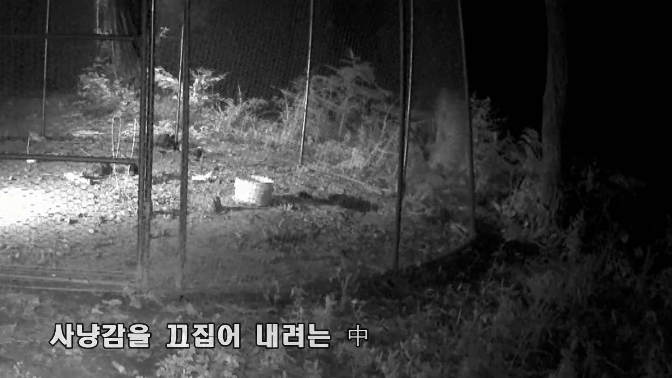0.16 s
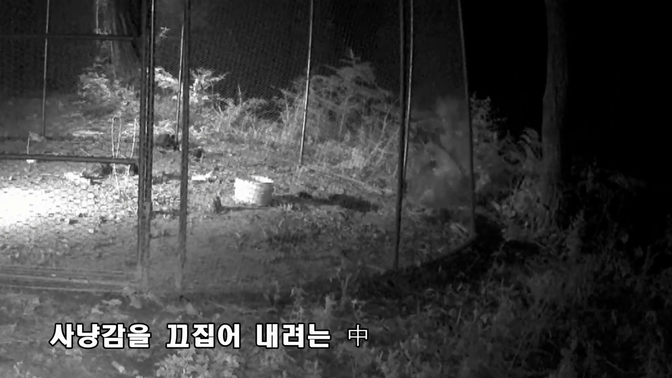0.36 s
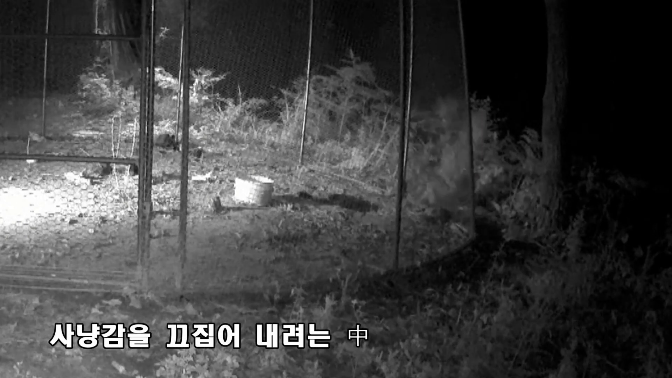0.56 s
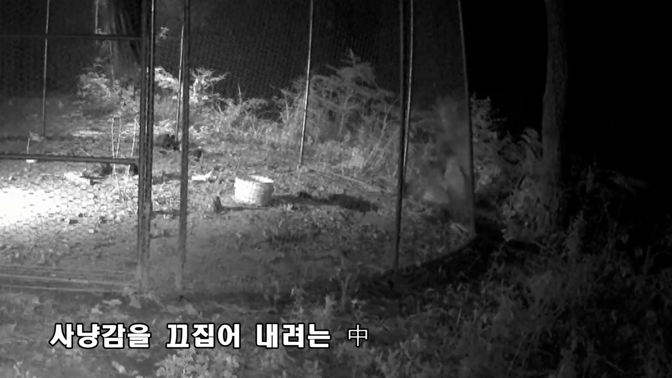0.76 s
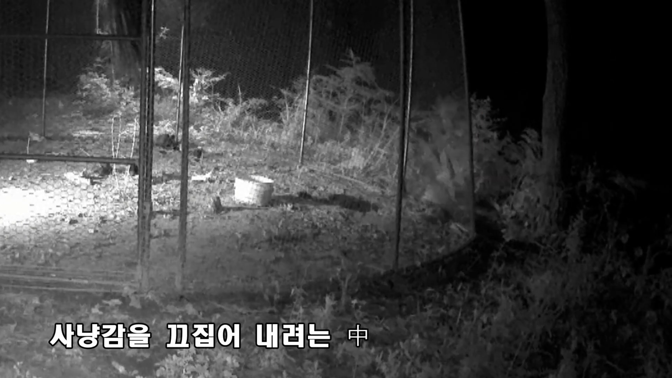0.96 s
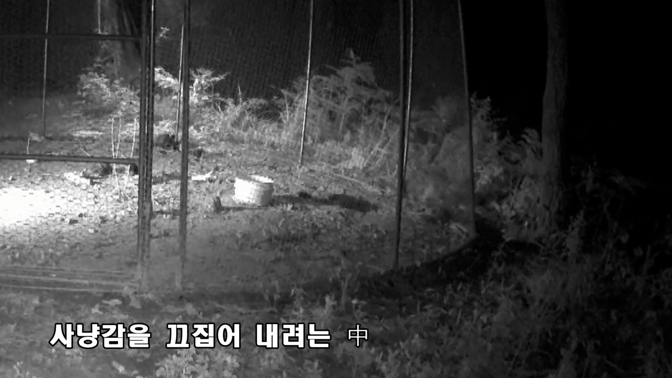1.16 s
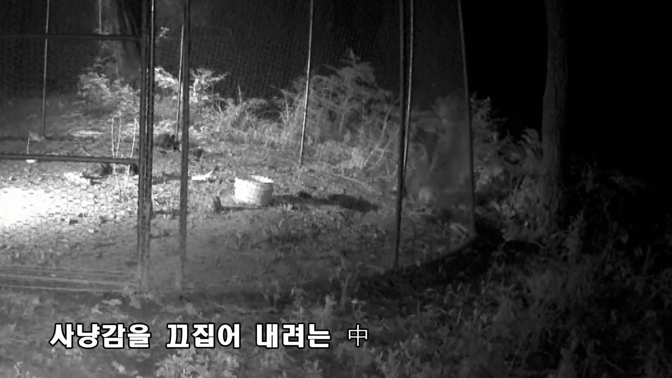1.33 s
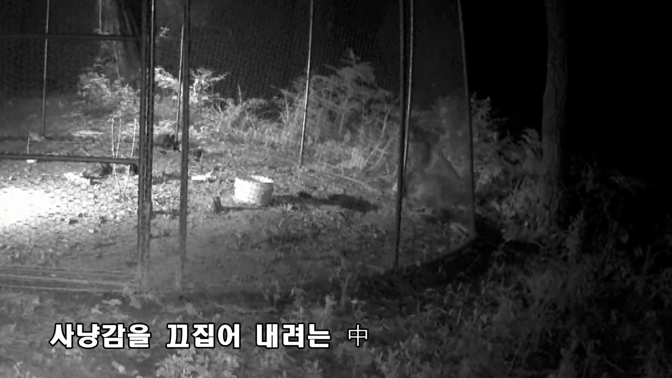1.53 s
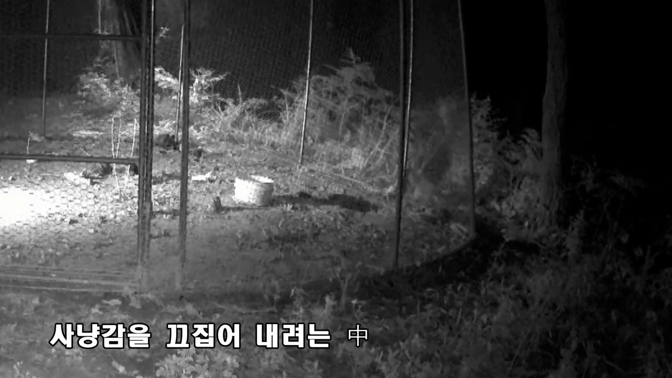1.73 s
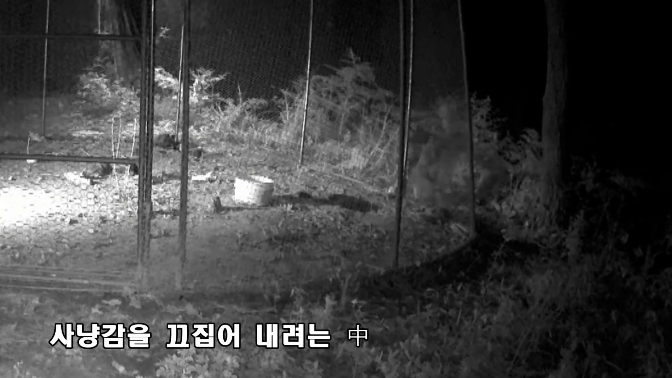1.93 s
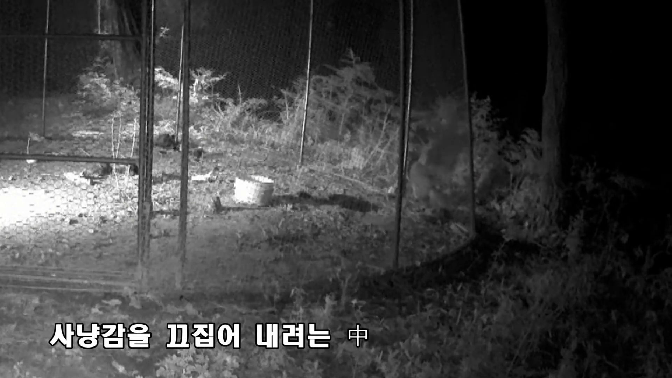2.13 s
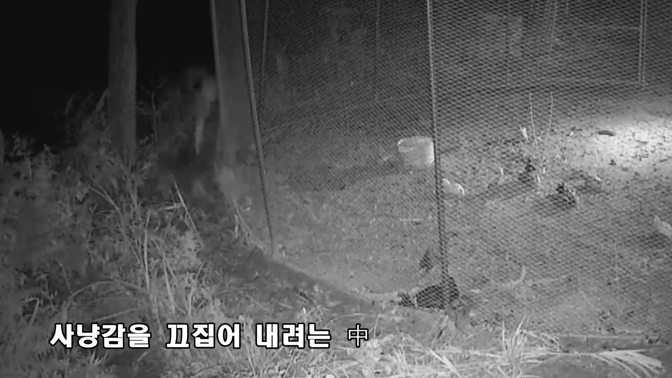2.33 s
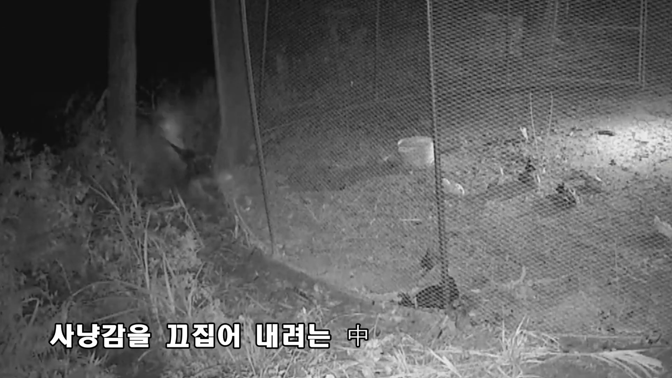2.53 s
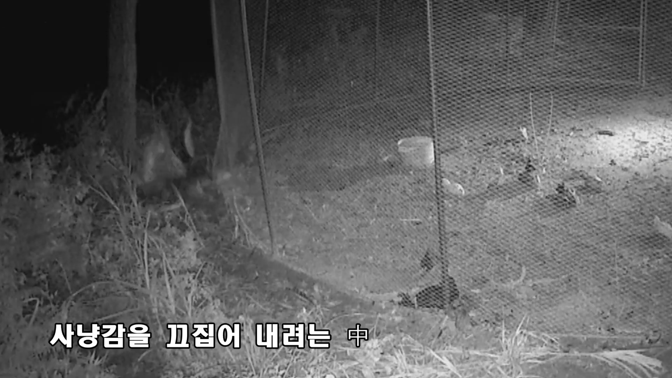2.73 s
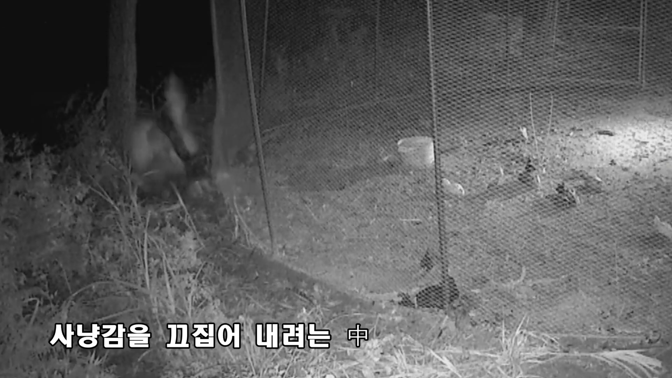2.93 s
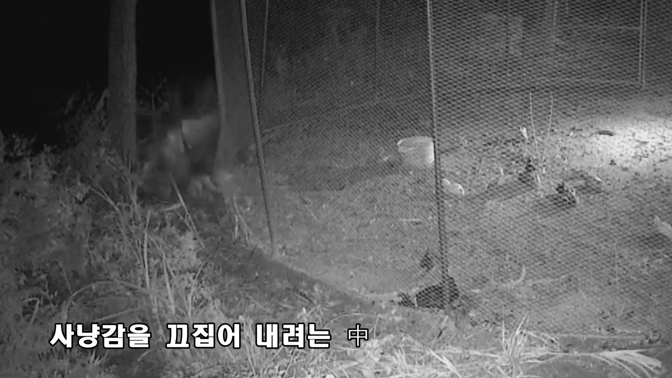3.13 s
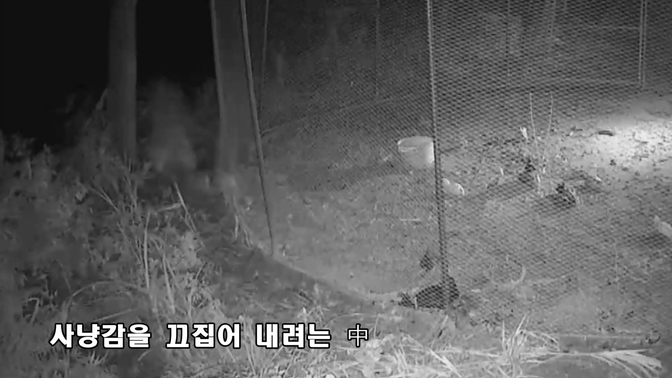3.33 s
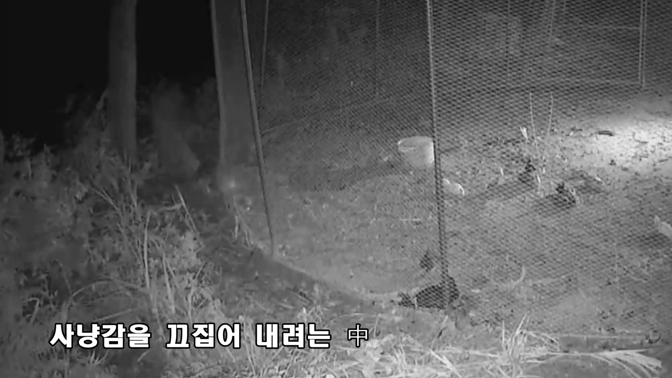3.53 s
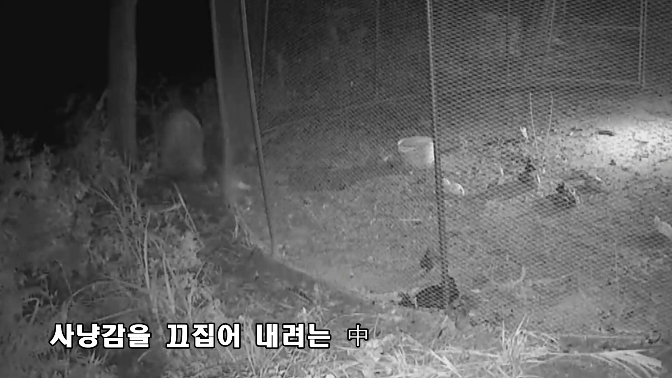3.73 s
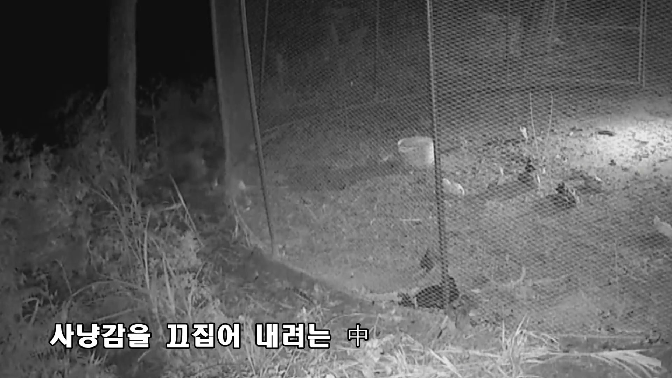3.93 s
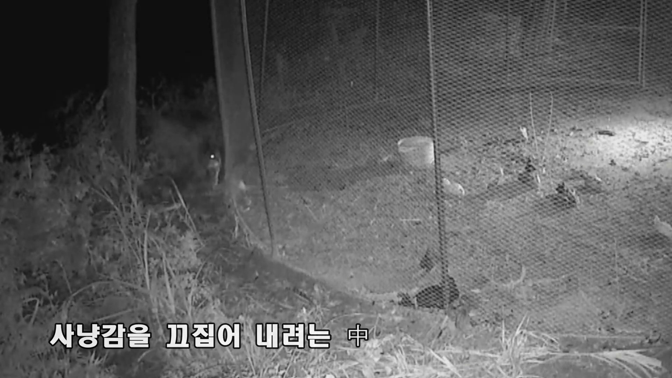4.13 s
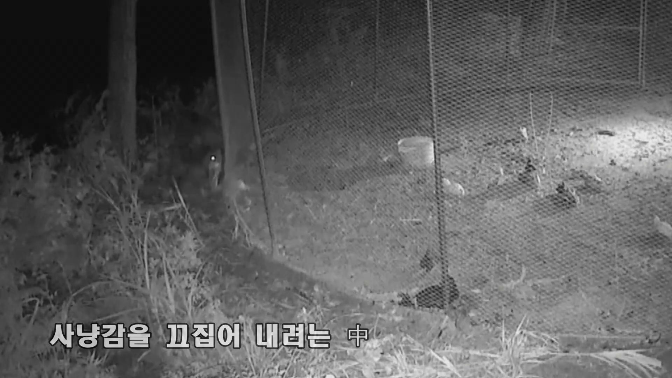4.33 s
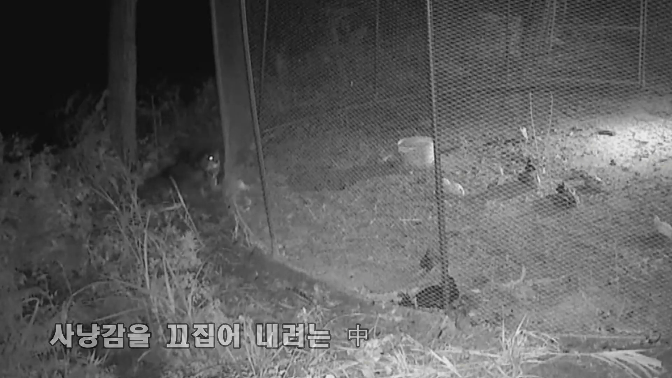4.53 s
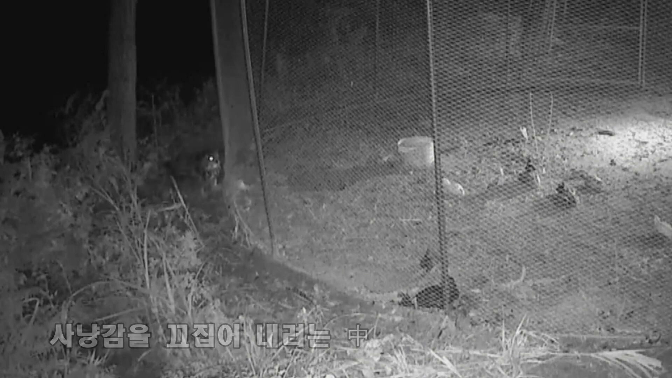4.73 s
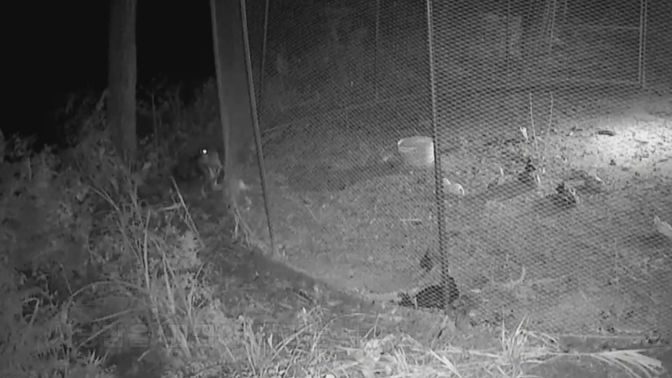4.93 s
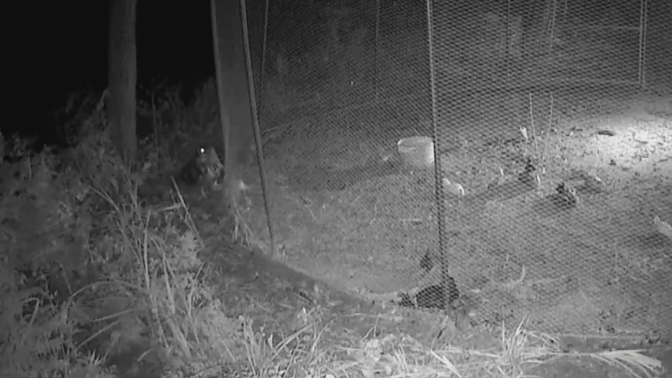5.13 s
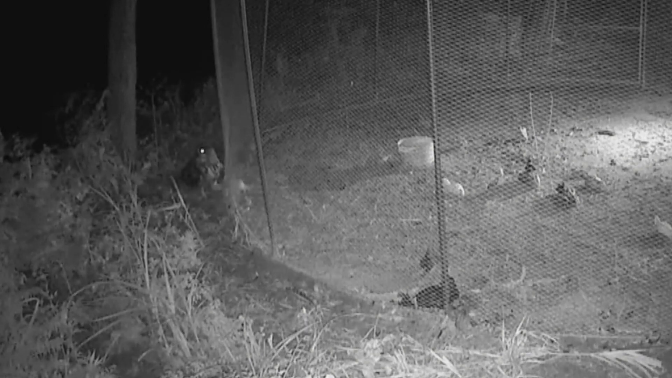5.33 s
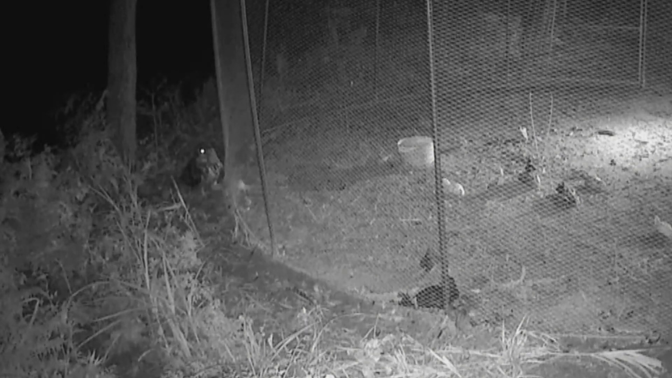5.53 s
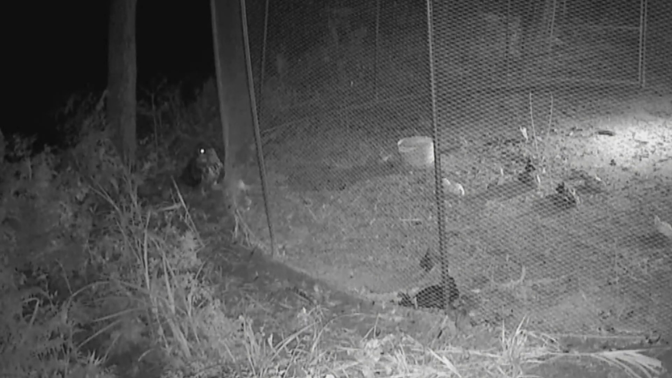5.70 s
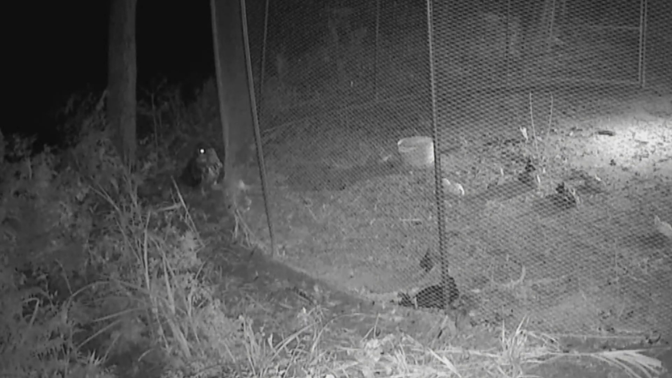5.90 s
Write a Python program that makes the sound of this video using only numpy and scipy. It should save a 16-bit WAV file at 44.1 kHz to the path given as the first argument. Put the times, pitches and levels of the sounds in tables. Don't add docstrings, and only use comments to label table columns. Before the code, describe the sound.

Bursts of metallic mesh rattle and body thumps come twice, then a wire twangs and only buzzing, throbbing night insects remain.

```python
import sys
import numpy as np
from scipy import signal
from scipy.fft import rfft, irfft
from scipy.io import wavfile
from scipy.ndimage import uniform_filter1d

SR = 44100
rng = np.random.default_rng(int(sys.argv[2]) if len(sys.argv) > 2 else 0)


def ratio(d):
    e = np.asarray(d, float) / 20
    return 10 ** e


def transcribe(signal):
    frames = np.atleast_2d(signal).T
    limited = np.clip(frames, -1, 1)
    pcm = np.round(limited * 32767).astype(np.int16)
    wavfile.write(sys.argv[1], SR, pcm)


N = 262836
T = np.arange(N) / SR


def unit(x):
    return x / np.sqrt(np.mean(x ** 2))


def colour(x, points):
    hz, db = np.transpose(points)
    f = np.maximum(np.fft.rfftfreq(4096, 1 / SR), 1)
    cepstrum = irfft(np.log(ratio(np.interp(np.log(f), np.log(hz), db))))
    cepstrum[1:2048] *= 2
    cepstrum[2049:] = 0
    impulse = irfft(np.exp(rfft(cepstrum)))
    return unit(signal.fftconvolve(x, impulse)[:N])


def band(x, hz, width):
    edges = [hz - width / 2, hz + width / 2]
    return signal.sosfilt(signal.butter(2, edges, "band", fs=SR, output="sos"), x)


def ring(x, hz, t60):
    r = np.exp(-np.log(1000) / (t60 * SR))
    w = 2 * np.pi * hz / SR
    return signal.lfilter([1, 0, -1], [1, -2 * r * np.cos(w), r * r], x)


def modes(x, table):
    total = np.zeros(N)
    for hz, width, db in table:
        t60 = 1.5 / width
        total += ratio(db) * unit(ring(ring(x, hz, t60), hz, t60))
    return unit(total)


def walk(rate):
    k = int(SR / rate)
    return unit(uniform_filter1d(uniform_filter1d(rng.standard_normal(N), k), k))


def clicks(rate, spread_db):
    chance = rng.random((3, N))
    hits = chance[0] < rate / SR
    size = ratio(-spread_db * np.log(1 - .995 * chance[2]))
    return hits * np.sign(chance[1] - .5) * size


def shape(s, rise, hold, t60):
    t = T - s
    attack = np.sin(np.pi / 2 * np.clip(t / rise, 0, 1)) ** 2
    return attack * ratio(-60 * np.clip(t - rise - hold, 0, None) / t60)


def bump(centre, length):
    return np.cos(np.pi * np.clip((T - centre) / length, -.5, .5)) ** 2


# (frequency [Hz], level [dB per Hz])
AIR_TONE = [(12, -28), (24, -14.5), (88, 2), (163, -8.5), (357, -4.5), (499, -11), (558, -9), (698, -12.5),
            (1030, -8.5), (2460, -16), (7520, -11), (9400, -3.5), (14300, -11.5), (16000, -22)]
# (time [s], level [dB])
AIR_CALM = [(4.3, 0), (4.75, -5.5)]


def night_air():
    level_db = -61 + 10.5 + np.interp(T, *np.transpose(AIR_CALM)) + .4 * walk(1)
    return colour(rng.standard_normal(N), AIR_TONE) * ratio(level_db)


# (frequency [Hz], width [Hz], level [dB])
TRILL_BANDS = [(8370, 690, -3.5), (8880, 300, -2.5), (9620, 600, -2.5), (10240, 1500, -7)]
# (time [s], level [dB])
TRILL_LEVEL = [(2.2, -69), (3.2, -52.5), (4.2, -48.5), (4.7, -54.5), (5.3, -55.5), (5.96, -53.5)]


def tree_crickets():
    rate_hz, peak_s = 28.25, 5.241
    noise = np.zeros(N)
    for hz, width, db in TRILL_BANDS:
        noise += ratio(db) * unit(band(rng.standard_normal(N), hz, width))
    throb = ratio(7.0 * np.cos(2 * np.pi * rate_hz * (T - peak_s)) + 1.3 * walk(15))
    return unit(noise * throb) * ratio(np.interp(T, *np.transpose(TRILL_LEVEL)))


# (frequency [Hz], level [dB per Hz])
LEAF_TONE = [(180, -24.5), (300, -9.5), (701, -14), (1510, -5), (2360, -7.5), (2570, -7.5), (5160, -6.5),
             (5610, -8), (10900, -9.5), (14200, -20), (16000, -23)]
# (frequency [Hz], level [dB per Hz])
CLATTER_TONE = [(88, -27), (150, -23), (649, -15), (998, -3.5), (2920, -4.5), (3220, -6), (4580, -4),
                (5360, -5), (7180, -5.5), (13700, -15.5), (16000, -44)]
# (frequency [Hz], width [Hz], level [dB])
WIRE_MODES = [(1750, 135, 4), (2013, 49, 8), (2343, 100, 3), (2606, 46, -3.5), (3225, 160, 6.5),
              (3930, 20, 4), (4200, 180, -15), (4910, 65, -9.5), (5330, 52, -10.5), (5900, 31, -2.5)]
# (time [s], level [dB], clatter length [s], fall t60 [s], after-rattle relative to jolt [dB])
MESH_JOLTS = [(2.394, -17.5, 0.013, 0.08, -15), (2.642, -35, 0.0043, 0.16, 0.5),
              (2.904, -15, 0.019, 0.076, -7), (3.205, -30, 0.0067, 0.079, -38),
              (3.248, -30, 0.019, .05, -36), (3.259, -15, 0.028, 0.032, -8),
              (3.601, -14, 0.023, 0.069, -14), (3.749, -45, 0.015, 0.16, 2.5),
              (3.847, -25, .003, 0.019, -30), (3.854, -26, 0.0048, 0.035, -14.5),
              (3.876, -39.5, 0.0044, 0.072, 1.5), (4.054, -55, 0.0041, 0.075, 1),
              (4.121, -30, 0.0096, 0.11, -4), (4.727, -56.5, 0.055, 0.26, 0)]


def mesh_clatter():
    after_t60_s, settle_after_s, settle_t60_s = 0.32, 0.11, 0.17
    hard_power, soft_power = np.zeros(N), np.zeros(N)
    for s, db, hold, t60, after_db in MESH_JOLTS:
        at = slice(int(s * SR), int(s * SR) + SR // 2)
        t = T[at] - s
        attack = np.clip(t / 0.0035, 0, 1) ** 2
        past = np.maximum(t - hold, 0)
        swell = 5 * np.clip(1 - t / hold, 0, 1)
        hard_power[at] += attack * ratio(2 * (db - swell - 60 * past / t60))
        settle = 60 * np.maximum(t - settle_after_s, 0) / settle_t60_s
        soft_power[at] += attack * ratio(2 * (db + after_db - 60 * past / after_t60_s - settle))
    contacts = clicks(9000, 2.9)
    links = unit(colour(contacts, CLATTER_TONE) + ratio(-12) * modes(contacts, WIRE_MODES))
    links = links * ratio(-2.5 + 0.79 * walk(170))
    slack_links = colour(clicks(10000, 2.8), LEAF_TONE) * ratio(1.2 * walk(120))
    return np.sqrt(hard_power) * links + np.sqrt(soft_power) * slack_links


# (time [s], length [s], level [dB], release t60 [s], brightness [dB])
BRUSHES = [(2.435, 0.112, -41.5, 0.092, 2), (2.522, 0.1, -37.5, 0.27, 1.7),
           (2.689, 0.036, -42, 0.067, -1.5), (2.717, 0.079, -53, 0.98, -0.5), (2.99, 0.043, -49, 0.74, -3),
           (3.17, 0.078, -55.5, .5, -9), (3.34, .1, -44, 0.46, -0.5), (3.459, 0.33, -45.5, 1, 3.5),
           (3.763, 0.042, -38.5, 0.17, -4.5), (3.844, 0.069, -46.5, 0.32, 7.5), (3.953, 0.3, -52, 0.63, 9),
           (4.187, 0.098, -53, 0.22, 9), (4.24, 0.046, -44.5, 0.18, 9.5), (4.301, 0.055, -51, 0.91, 6.5)]


def leaf_rustle():
    rise = 0.23
    leaves = colour(clicks(5000, 2.8), LEAF_TONE) * ratio(1.6 * walk(90))
    top = signal.sosfilt(signal.butter(1, 3500, "high", fs=SR, output="sos"), leaves)
    dull_power, shrill_power = np.zeros(N), np.zeros(N)
    for s, length, db, t60, bright_db in BRUSHES:
        power = shape(s, rise * length, (1 - rise) * length, t60) ** 2
        dull_power += power * ratio(2 * (db - bright_db))
        shrill_power += power * ratio(2 * (db + bright_db))
    return np.sqrt(dull_power) * (leaves - top) + np.sqrt(shrill_power) * top


# (frequency [Hz], width [Hz], level [dB])
POST_BODY = [(228.7, 16.4, 4.5), (348, 32, 1.5), (414, 22, -13.5), (480, 18, -10), (551.7, 12, -14.5)]
POST_LOW_MODE = [(132.5, 15.4, 0)]
POST_HIGH_MODES = [(857, 11, 3.5), (985, 61, 1.5), (1086, 4.5, 1), (1246, 51, 5)]
# (time [s], level [dB], hold [s], deep mode [dB], high modes [dB])
POST_SHUDDERS = [
    (2.629, -54, 0.0022, -24.5, -18),
    (3.742, -34.5, 0.054, -12.5, -12.5),
    (4.121, -45, 0.02, -10.5, -3),
]


def shaken_post(table):
    x = modes(clicks(1500, 3.9), table)
    return x / np.sqrt(uniform_filter1d(x ** 2, size=2500) + .05) * ratio(2.5 * walk(70))


def post_shudder():
    rise_s = 0.026
    body, deep, high = (shaken_post(table) for table in (POST_BODY, POST_LOW_MODE, POST_HIGH_MODES))
    out = np.zeros(N)
    for s, db, hold, deep_db, high_db in POST_SHUDDERS:
        mix = shape(s, rise_s, hold, 0.36) * body
        mix += ratio(deep_db) * shape(s + 0.027, 0.072, hold / 2, 0.55) * deep
        mix += ratio(high_db - 2.5) * shape(s, rise_s, hold / 2, 0.23) * high
        out += ratio(db + 7.0) * mix
    return out


# (centre time [s], length [s], level [dB])
BUZZ_TIMES_A = [(2.27, .09, -51), (3.27, 0.23, -39), (4.02, 0.19, -43), (4.80, 0.11, -42),
                (4.87, 0.087, -49.5), (5.53, 0.16, -43.5)]
BUZZ_TIMES_B = [(2.88, 0.086, -43), (3.47, 0.095, -46.5), (5.02, 0.12, -45), (5.10, 0.1, -52),
                (5.755, 0.11, -44.5), (5.92, 0.15, -46.5)]
# (multiple of the tooth rate, level [dB])
WING_LINES_A = [(25, -16), (26, -10), (27, -6), (28, 0), (29, -7), (30, -5), (31, -4), (32, -8), (33, -11),
                (34, -16)]
WING_LINES_B = [(25, -14), (26, -7), (27, -1), (28, -2), (29, -4), (30, 0), (31, -4), (32, -5), (33, -6),
                (34, -13)]


def bush_cricket(table, wing, teeth_hz):
    comb = np.zeros(N)
    for k, db in wing:
        line = np.sin(2 * np.pi * round(k) * teeth_hz * T + k * k)
        comb += ratio(db + 3.5 * walk(45)) * line
    rasp = .5 * unit(band(rng.standard_normal(N), 10900, 2600))
    gain = sum(ratio(db - 1.0) * bump(s, length * 1.17) for s, length, db in table)
    return unit(unit(comb) + rasp) * gain


# (time [s], peak level [dB], pitch [Hz], t60 [s])
BODY_THUMPS = [(2.397, -38, 794, 0.086), (2.406, -55, 338, 0.083), (2.921, -31.5, 527, 0.057),
               (3.037, -46, 356, 0.032), (3.202, -31.5, 349, 0.045), (3.276, -21, 425, 0.037),
               (3.618, -36.5, 572, 0.11), (3.702, -36, 410, 0.022), (4.732, -34, 341, 0.076)]


def thumps():
    out = np.zeros(N)
    for s, db, hz, t60 in BODY_THUMPS:
        t = np.maximum(T - s, 0)
        push = ratio(db + 9.5 - 60 * t / t60) * (1 - np.exp(-t / 0.0037))
        out += push * np.sin(2 * np.pi * hz * t)
    return out


def chirps(table, start_hz, fall_hz, length, period, first_db):
    out = np.zeros(N + SR)
    t = np.arange(int(length * SR)) / SR
    glide = np.sin(2 * np.pi * t * (start_hz - fall_hz * t / length / 2))
    whistle = np.sin(np.pi * t / length) * glide
    for first, last, db in table:
        uneven = rng.standard_normal(12)
        count = max(round((last - first) / period), 0) + 1
        for k, s in enumerate(np.linspace(first, last, count)):
            i = int((s - length / 2) * SR)
            offset_db = first_db if k == 0 else 0.61 * uneven[k]
            out[i:i + len(t)] += ratio(db + 3.5 + offset_db) * whistle
    return out[:N] * ratio(1.8 * walk(150))


# (first whistle time [s], last whistle time [s], level [dB])
NEAR_TRAINS = [(3.054, 3.246, -56), (3.417, 3.417, -56), (4.016, 4.016, -58)]
QUICK_TRAINS = [(2.265, 2.307, -65), (4.44, 4.68, -65), (4.72, 4.85, -64), (4.932, 5.059, -65),
                (5.153, 5.277, -65)]
SLOW_TRAINS = [(5.445, 5.911, -63)]


def field_crickets():
    near = chirps(NEAR_TRAINS, start_hz=4170, fall_hz=300, length=.04, period=.064, first_db=-.5)
    quick = chirps(QUICK_TRAINS, start_hz=4180, fall_hz=400, length=.0288, period=.042, first_db=-1.5)
    slow = chirps(SLOW_TRAINS, start_hz=4160, fall_hz=700, length=.042, period=.0666, first_db=-3.5)
    return near + quick + slow


# (time [s], level [dB], hold [s], t60 [s], pitch [Hz])
HINGE_SQUEAKS = [
    (3.742, -46, .025, .25, 4225),
    (4.056, -47, .012, .25, 4230),
    (4.12, -47, .04, .3, 4320),
    (4.185, -53, .02, .1, 4230),
]


def hinge_squeak():
    s, pitch_hz = np.transpose(HINGE_SQUEAKS)[[0, -1]]
    hz = np.interp(T, s, pitch_hz) * (1 + .012 * walk(60))
    whistle = np.sin(2 * np.pi * np.cumsum(hz) / SR) * ratio(4.0 * walk(92))
    bar = modes(clicks(990, 1.1), [(4295, 140, 0), (12100, 300, -14)])
    gain = sum(ratio(db + 6.5) * shape(s, 0.014, hold, t60) for s, db, hold, t60, _ in HINGE_SQUEAKS)
    return (whistle + 0.53 * bar) * gain


# (multiple of the pitch, level [dB])
WIRE_PARTIALS = [(1, -5), (2, 0), (3, -13), (4, -12), (5, -23), (6, -19), (7, -32)]
# (frequency [Hz], level [dB], t60 [s])
STAKE_MODES = [(570, -58.5, 2.06), (254, -47.5, 0.44), (180, -53, 0.24), (1010, -62, 1.7)]


def wire_twang():
    pluck_s, rise_s = 4.732, .018
    rest_hz, tight_hz, start_hz = 367.6, 48.4, 349
    t = np.clip(T - pluck_s, 0, 2)
    slack = np.exp(-((T - 4.818) / .011) ** 2)
    hz = rest_hz + tight_hz * np.exp(-t / 0.0694) - 22 * slack
    hz = hz + (start_hz - hz) * np.exp(-(t / 0.0096) ** 2 / 2) + 3 * walk(38)
    phase = 2 * np.pi * np.cumsum(hz) / SR
    gain = shape(pluck_s, rise_s, 0, .13) + ratio(-11) * shape(pluck_s, rise_s, 0, .62)
    tone, stake = np.zeros(N), np.zeros(N)
    for k, db in WIRE_PARTIALS:
        fade_db = 2.5 * max(k - 2, 0) * t
        tone += ratio(db + 1.6 * walk(53) - fade_db) * np.sin(k * phase + k * k)
    for f, db, t60 in STAKE_MODES:
        stake += ratio(db - 60 * t / t60 + 3.5 * walk(28)) * np.sin(2 * np.pi * f * t)
    return tone * gain * ratio(-36.5 + 6.5 - 2.5 * slack) + stake


# (time [s], level [dB])
FIRST_HEARING = [(0, -2), (1.1, -3.5), (2.38, -5), (2.392, -1.22)]


def scene():
    change_s, repeat_samples = 2.225, 108888
    pen = mesh_clatter() + leaf_rustle() + post_shudder() + thumps() + hinge_squeak() + wire_twang()
    insects = tree_crickets() + field_crickets()
    insects += bush_cricket(BUZZ_TIMES_A, WING_LINES_A, teeth_hz=366.2)
    insects += bush_cricket(BUZZ_TIMES_B, WING_LINES_B, teeth_hz=368.5)
    heard = pen + insects + night_air()
    heard = np.where(T < change_s, np.roll(heard, -repeat_samples), heard)
    heard = heard * ratio(np.interp(T, *np.transpose(FIRST_HEARING)))
    return np.array([heard, np.zeros(N)])


def low_pass(x):
    return signal.sosfilt(signal.butter(12, 16520, fs=SR, output="sos"), x)


def record(dry):
    top_cut = signal.ellip(8, .2, 60, 15830, fs=SR, output="sos")
    mix = signal.sosfilt(top_cut, dry)
    return low_pass(mix)


dry = scene()
out = record(dry)
transcribe(out)
```